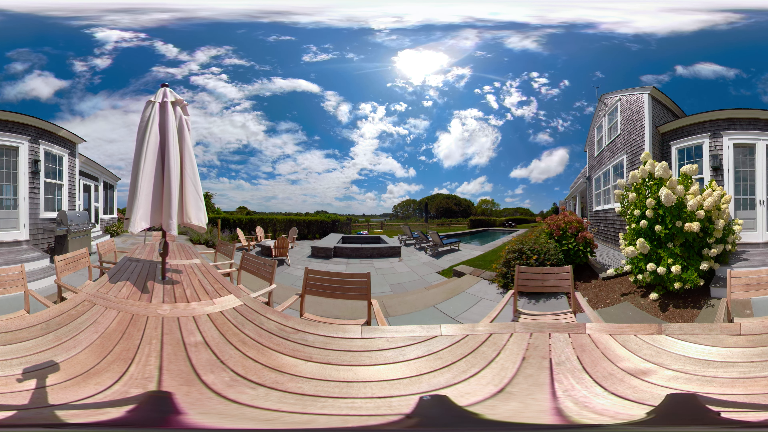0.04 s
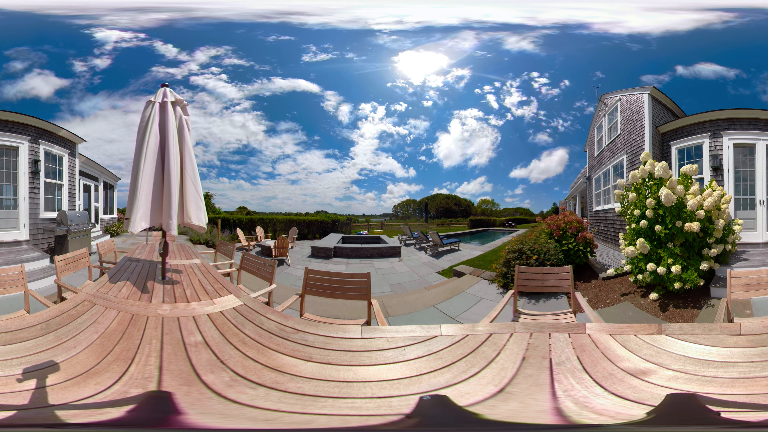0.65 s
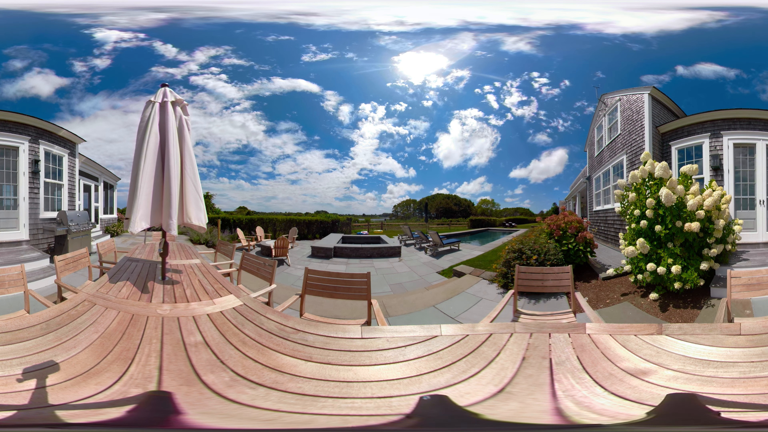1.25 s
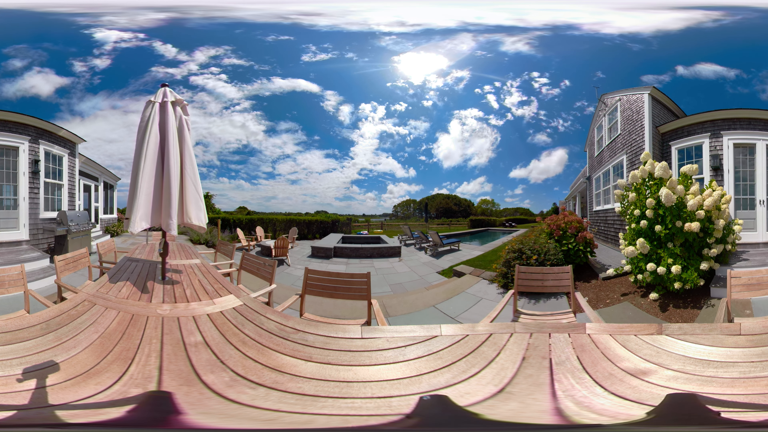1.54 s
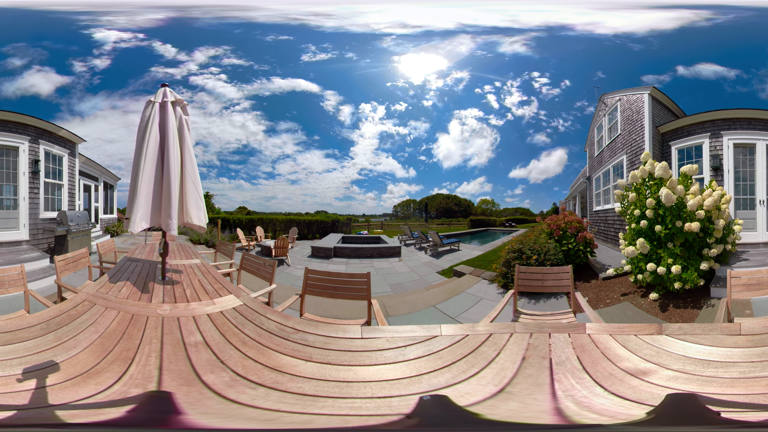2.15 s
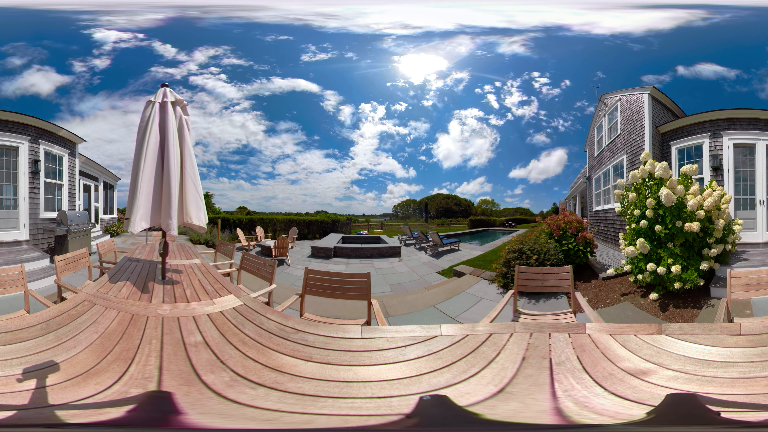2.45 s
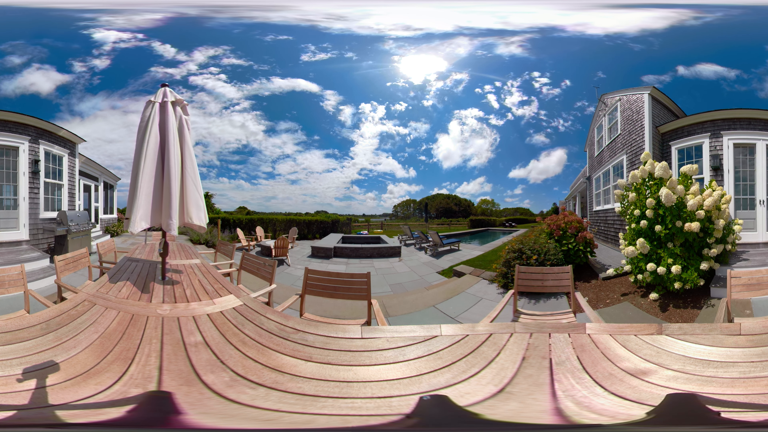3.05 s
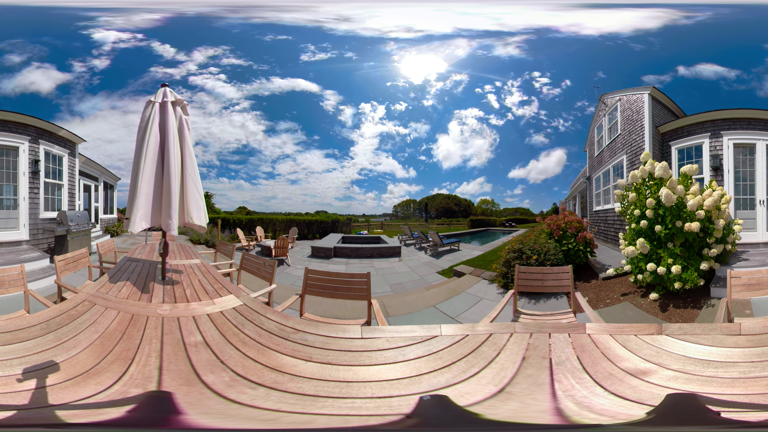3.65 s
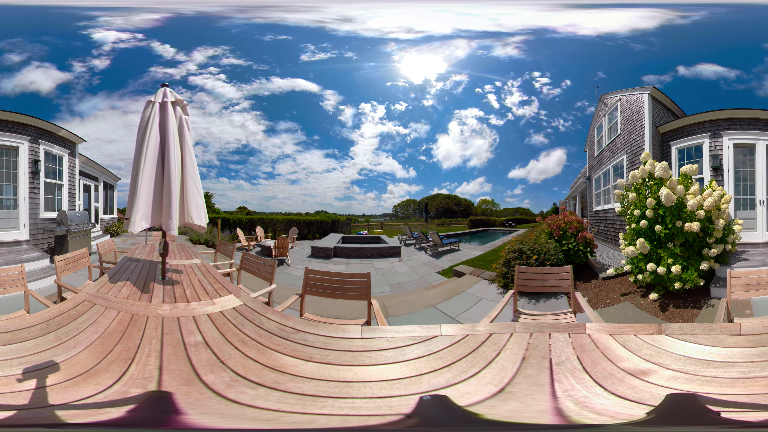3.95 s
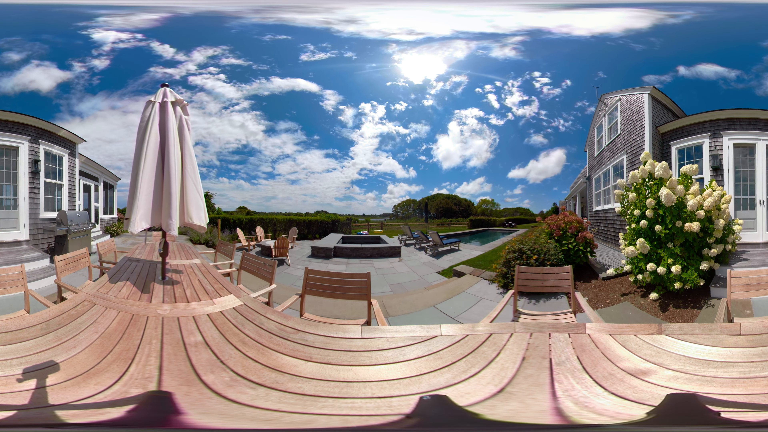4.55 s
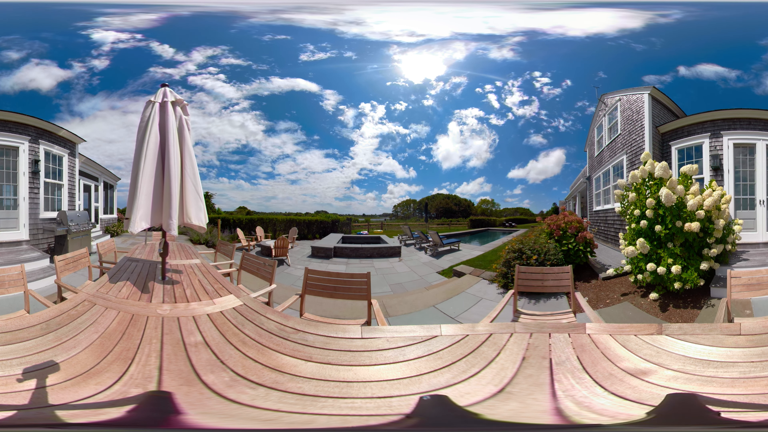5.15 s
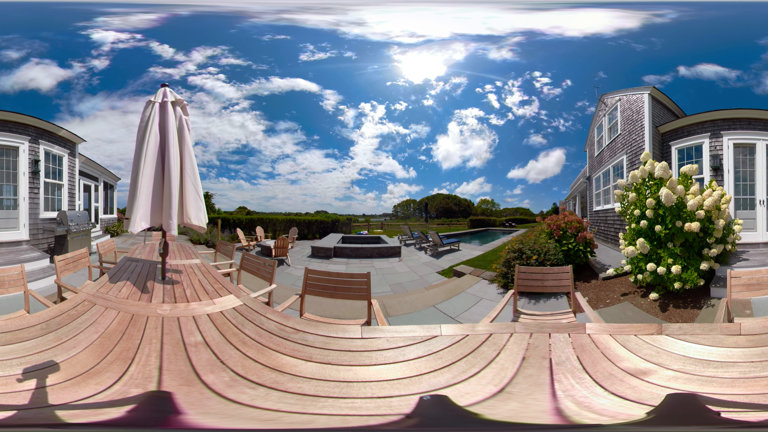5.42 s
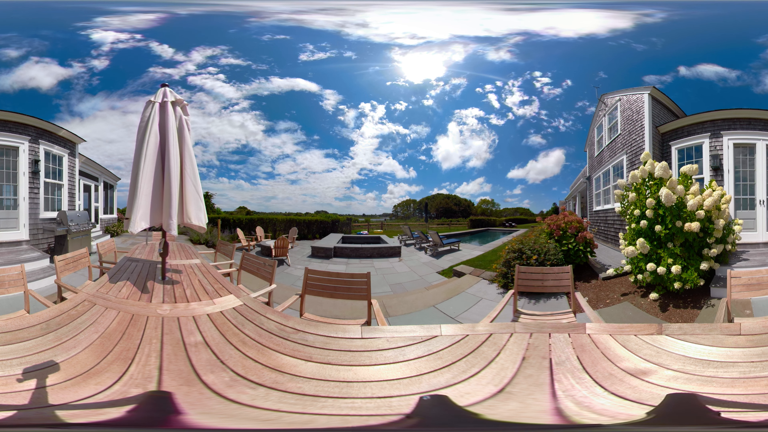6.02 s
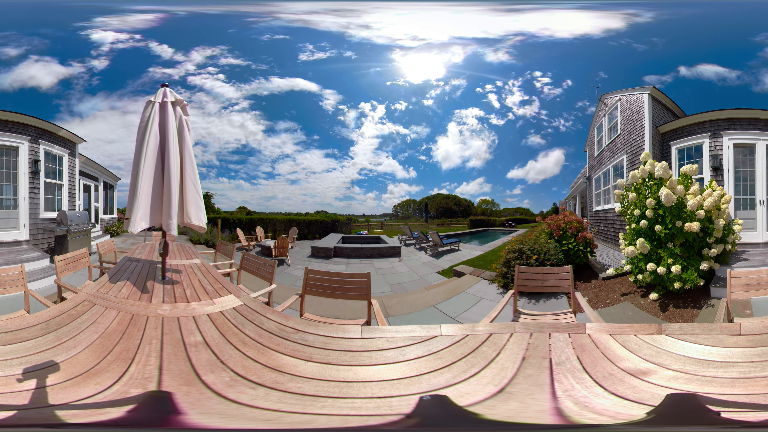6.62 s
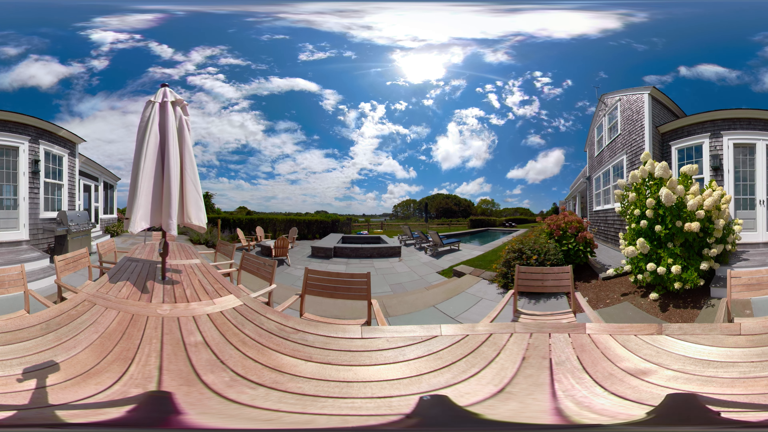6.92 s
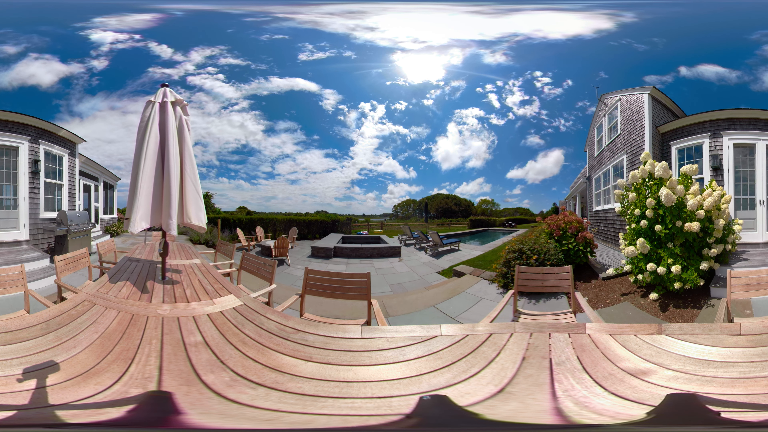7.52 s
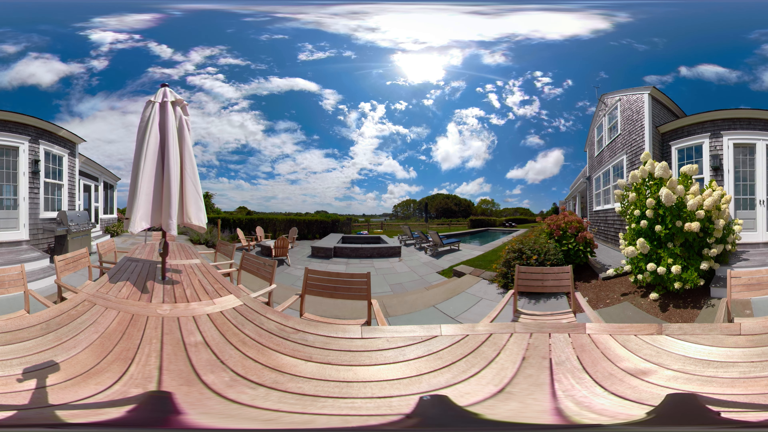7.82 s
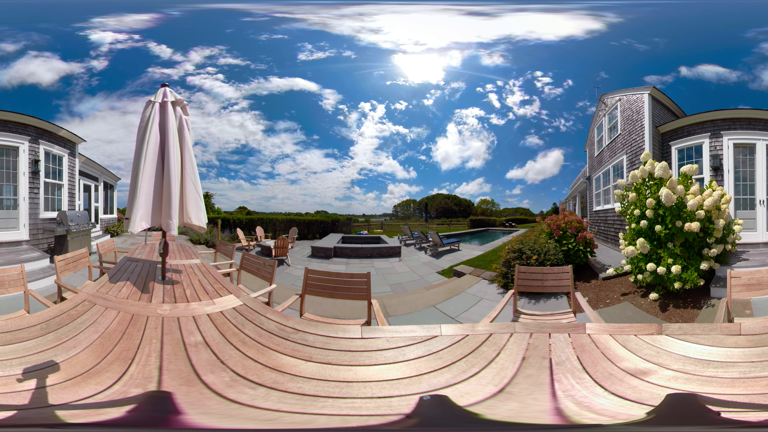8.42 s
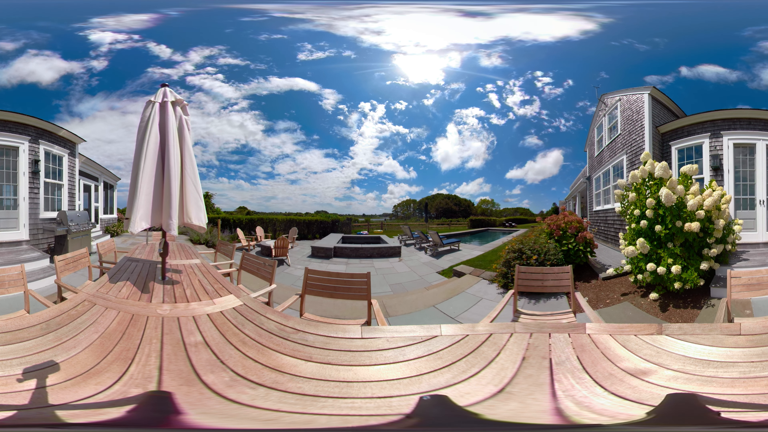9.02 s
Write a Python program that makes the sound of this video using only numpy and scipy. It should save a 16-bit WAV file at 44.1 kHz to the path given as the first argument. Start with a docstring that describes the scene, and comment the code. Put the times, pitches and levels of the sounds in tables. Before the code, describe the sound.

On a quiet garden patio, a faint distant rumble, soft leaves and airy hiss carry on throughout. A few small puffs of wind bump the microphone near the start, followed by a long calm with barely audible far chirps and a thin insect trill. About two thirds of the way in, a gust buffets the microphone with low rumbling and thumps, then eases into weaker puffs.

```python
"""Wind on a garden patio.

Small puffs of wind rock the microphone with their eddies; late on, a gust buffets it
and thumps on its port, and a gain control ducks the loudest moments. Behind it are a far
low rumble, leaves, a soft hiss of air, an insect's faint wing trill and far chirps."""
import sys
import numpy as np
from scipy import signal
from scipy.fft import rfft, irfft
from scipy.io import wavfile
from scipy.ndimage import uniform_filter1d, minimum_filter1d

SR = 44100
rng = np.random.default_rng(int(sys.argv[2]) if len(sys.argv) > 2 else 0)


def persist_wave(psi):
    """Save psi, clipped to +-1, as 16-bit WAV."""
    counts = np.round(np.clip(psi, -1, 1) * 32767).astype(np.int16)
    wavfile.write(sys.argv[1], SR, np.atleast_2d(counts).T)


N = 408807
TIME = np.arange(N) / SR
FREQ_HZ = np.fft.rfftfreq(N, 1 / SR)


def gain_of(db):
    """Decibels to amplitude."""
    return 10 ** (np.asarray(db) / 20)


def unit_rms(x):
    """Scales to rms 1."""
    return x / np.sqrt(np.mean(x ** 2) + 1e-20)


def bump(peak_s, half_s, shape):
    """A swell peaking at 1; shape 1 is pointed, 2 round."""
    return np.exp(-np.minimum(abs((TIME - peak_s) / half_s), 30) ** shape)


def noise(spectrum):
    """Steady unit-rms noise, its spectrum interpolated over log frequency."""
    hz, db = np.transpose(spectrum)
    colour_db = np.interp(np.log(FREQ_HZ + 1), np.log(hz + 1), db)
    return unit_rms(irfft(rfft(rng.standard_normal(N)) * gain_of(colour_db), N))


def airy_noise(spectrum, patchy_db, flicker_db):
    """Noise whose colour drifts in patches and whose level flickers."""
    frames = signal.stft(noise(spectrum), nperseg=512, noverlap=384)[2]
    patches = uniform_filter1d(rng.standard_normal(frames.shape), size=16, axis=0)
    patches = unit_rms(uniform_filter1d(patches, size=24, axis=1))
    flicker = unit_rms(uniform_filter1d(rng.standard_normal(frames.shape[1]), size=10))
    frames *= gain_of(patchy_db * patches + flicker_db * flicker)
    return unit_rms(signal.istft(frames, nperseg=512, noverlap=384)[1][:N])


# Puffs at the microphone. Each row: peak time in seconds, level in dB, half length in seconds.
WIND_PUFFS = [(.03, -67.5, 0.055), (.5, -57, 0.1), (0.607, -43, 0.015), (.69, -56, 0.053),
              (.9, -46.5, 0.057), (1.0, -64, 0.44), (2.45, -60, .05), (2.61, -60, .04), (3.176, -62, 0.037),
              (4.78, -52, 0.05), (6.41, -55, .03), (6.572, -52, 0.047), (6.666, -38, 0.034),
              (6.76, -38, 0.038), (6.95, -41, 0.08), (7.108, -42, 0.07), (7.231, -32, 0.038),
              (7.287, -24, 0.026), (7.351, -44, 0.041), (7.472, -23.5, 0.036), (7.522, -24, 0.024),
              (7.605, -22.5, 0.0385), (7.745, -20.5, .07), (7.912, -24.5, .024), (8.009, -29.5, 0.033),
              (8.087, -30, 0.062), (8.213, -35, 0.028), (8.313, -29, .035), (8.412, -36, 0.033),
              (8.508, -39, 0.033), (8.701, -46, 0.057), (8.868, -30.5, 0.044), (8.991, -30, 0.072),
              (9.142, -37.5, 0.038), (9.205, -42.5, 0.051)]
# Eddy spectra. Each row: frequency in Hz, relative density in dB.
LARGE_EDDY_SPECTRUM = [(8, -14.5), (20, -2), (35, 2), (48, -5.5), (68, -12.5), (95, -21), (145, -31.5),
                       (215, -23), (275, -41), (450, -57.5), (900, -66), (3000, -100)]
SMALL_EDDY_SPECTRUM = [(40, -13), (80, -5), (150, 8.5), (225, -15), (300, -10), (400, -24), (550, -34),
                       (2000, -65)]


def wind(floor_db=-80.5, steadiness=0.6, unit_speed_db=-31, small_db=-21, small_growth=0.47):
    """Large eddies rock the microphone, faster in strong puffs; small ones grow faster than the gust."""
    puff_power = sum((gain_of(db) * bump(s, half_s, 1.34)) ** 2 for s, db, half_s in WIND_PUFFS)
    force = np.sqrt(puff_power + gain_of(floor_db) ** 2)
    large = noise(LARGE_EDDY_SPECTRUM)
    envelope = np.sqrt(uniform_filter1d(abs(signal.hilbert(large)) ** 2, size=1500))
    large = unit_rms(large / envelope ** steadiness)  # the gust, more than chance, sets their size
    speed = np.maximum((force / gain_of(unit_speed_db)) ** 0.1, 0.8)
    large = np.interp(np.cumsum(speed) % N, np.arange(N), large)
    small = gain_of(small_db) * noise(SMALL_EDDY_SPECTRUM) * (force / force.max()) ** small_growth
    return force * (large + small)


# Wind thumps. Each row: peak time in seconds, peak level in dB, pitch in Hz, half length in seconds.
WIND_THUMPS = [(6.657, -42, 52, 0.012), (6.757, -34, 54.7, 0.013), (7.266, -26.5, 100, 0.0069),
               (7.283, -30, 175, 0.0044), (7.466, -19, 116.4, 0.0049), (7.519, -25.5, 65.6, .014),
               (7.61, -20.5, 90, 0.007), (7.628, -12.5, 162, 0.004), (7.636, -24, 332, 0.0037),
               (9.044, -36.5, 110.2, 0.0035), (9.144, -33.5, 56.13, 0.014)]


def thumps():
    """An eddy bursts on the port: a pressure dip that swings once or twice."""
    out = np.zeros(N)
    for peak_s, db, hz, half_s in WIND_THUMPS:
        swing = np.cos(2 * np.pi * hz * (TIME - peak_s))
        out -= gain_of(db) * bump(peak_s, half_s, 1.3) * swing
    return out


# Far rumble, leaves and air hiss. Each row: frequency in Hz, relative density in dB.
RUMBLE_SPECTRUM = [(20, -11.5), (60, -12), (100, -11), (125, -8), (155, 0), (220, -1.5), (275, -6.5),
                   (370, -11.5), (500, -15), (750, -22), (1100, -32), (2500, -46)]
LEAF_SPECTRUM = [(300, -18), (600, -0.5), (900, 0), (1350, -0.5), (1900, -3), (2900, -2.5), (3600, -6),
                 (4400, -14), (7000, -26.5)]
HISS_SPECTRUM = [(1500, -25.5), (3500, -15), (4400, -12.5), (5000, -4), (5700, -0.5), (6400, -4.5),
                 (7400, -2.5), (8500, -14.5), (9400, -18.5), (10300, -23), (11200, -13), (12100, -4.5),
                 (12900, -10.5), (15500, -8)]
# Brief hiss swells. Each row: peak time in seconds, rise in dB, half length in seconds.
HISS_RISES = [(.65, 1.5, 0.064), (4.282, 2, .05), (6.56, 1, 0.032), (7.583, 3, 0.036), (8.843, 2, 0.067)]
# Base level of all three layers. Each row: time in seconds, level in dB.
GARDEN_LEVEL = [(0, -67.5), (1.3, -67.0), (2.15, -67.5), (2.4, -70), (2.85, -69.4), (3.6, -70.5),
                (4.3, -70), (4.66, -72.0), (4.8, -67.5), (5.05, -67), (5.5, -68.6), (5.85, -68.5),
                (6.0, -70.5), (6.15, -68.4), (6.5, -68), (7.4, -67.4), (8.85, -67.5), (9.27, -67)]


def garden(rumble_db=10, leaves_db=-3.5, hiss_db=1.78, leaves_follow=0.95):
    """Far rumble, leaves and high hiss rise and fall together."""
    base_db = np.interp(TIME, *np.transpose(GARDEN_LEVEL))
    lull_db = base_db.max() - base_db
    swells_db = sum(db * bump(s, half_s, 2.7) for s, db, half_s in HISS_RISES)
    rumble = gain_of(rumble_db) * noise(RUMBLE_SPECTRUM)
    leaf_gain = gain_of(leaves_db + (1 - leaves_follow) * lull_db)
    leaves = leaf_gain * airy_noise(LEAF_SPECTRUM, patchy_db=1.03, flicker_db=0.6)
    hiss = gain_of(hiss_db + swells_db) * airy_noise(HISS_SPECTRUM, patchy_db=0.78, flicker_db=0.7)
    return gain_of(base_db) * (rumble + leaves + hiss)


# Far chirps and rustles. Each row: peak time in seconds, level in dB, pitch in Hz,
# width in Hz, half length in seconds.
FAR_CHIRPS = [(.73, -73, 3000, 380, 0.04), (3.52, -79, 1210, 150, 0.11), (3.63, -75, 7400, 250, .022),
              (3.79, -75, 7700, 220, .022), (3.86, -74.5, 1450, 280, .055), (6.498, -73, 2000, 800, 0.08)]


def chirps():
    """Small sounds blurred by distance into soft, narrow noise bands."""
    out = np.zeros(N)
    for peak_s, db, hz, width_hz, half_s in FAR_CHIRPS:
        passband = np.exp(-0.5 * ((FREQ_HZ - hz) / width_hz) ** 2)
        band = unit_rms(irfft(rfft(rng.standard_normal(N)) * passband, N))
        out += gain_of(db) * band * bump(peak_s, half_s, 2.2)
    return out


# Trill bouts. Each row: start in seconds, length in seconds, level in dB, pitch in Hz.
TRILL_BOUTS = [(.3, .6, -94, 9030), (1.5, .5, -94, 9020), (3.65, .8, -91, 9030), (4.65, 1.2, -90, 9000),
               (6.45, 1.35, -89, 9020), (8.0, 1.1, -93.5, 8950)]


def insect(strokes_per_s=21.5, sag_hz=70, wander_hz=15, fade_s=0.2):
    """Each wing stroke is a short high note that sags in pitch."""
    stroke = (strokes_per_s * TIME) % 1
    wander = unit_rms(uniform_filter1d(rng.standard_normal(N), size=200))
    bend_hz = sag_hz * (1 - 2 * stroke) + wander_hz * wander
    pulse = np.sin(np.pi * stroke) ** 6
    out = np.zeros(N)
    for start_s, length_s, db, hz in TRILL_BOUTS:
        fade = np.clip(np.minimum(TIME - start_s, start_s + length_s - TIME) / fade_s, 0, 1)
        tone = np.sin(2 * np.pi * np.cumsum(hz + bend_hz) / SR)
        out += gain_of(db) * fade * unit_rms(pulse * tone)
    return out


def scene():
    """All sources meet at one microphone."""
    return (garden() + wind() + thumps() + insect() + chirps())[None]


def gain_control(dry, sense_hz=150, threshold_db=-28.5, attack_s=0.02, hold_s=0.089, recover_db_per_s=12):
    """Senses the level above sense_hz, turns down fast, holds, recovers slowly."""
    sensed = signal.sosfilt(signal.butter(2, sense_hz, "high", fs=SR, output="sos"), dry[0])
    power_db = 10 * np.log10(abs(uniform_filter1d(sensed ** 2, size=600)) + 1e-12)
    half_hold = int(hold_s * SR / 2)
    held_db = -minimum_filter1d(-power_db, 2 * half_hold + 1, origin=half_hold)
    ramp_db = recover_db_per_s * TIME
    released_db = np.maximum.accumulate(held_db + ramp_db) - ramp_db
    over_db = np.maximum(released_db - threshold_db, 0)
    pole = np.exp(-1 / (attack_s * SR))
    cut_db = signal.lfilter([1 - pole], [1, -pole], over_db)
    return dry / gain_of(cut_db)


def record(dry):
    """Gain control, then a steep band limit."""
    edge_hz = 15680
    lowpass = signal.firwin(1023, edge_hz, window=("kaiser", 9), fs=SR)
    return signal.oaconvolve(gain_control(dry), lowpass[None], "same")


dry = scene()
out = record(dry)
persist_wave(out)
```